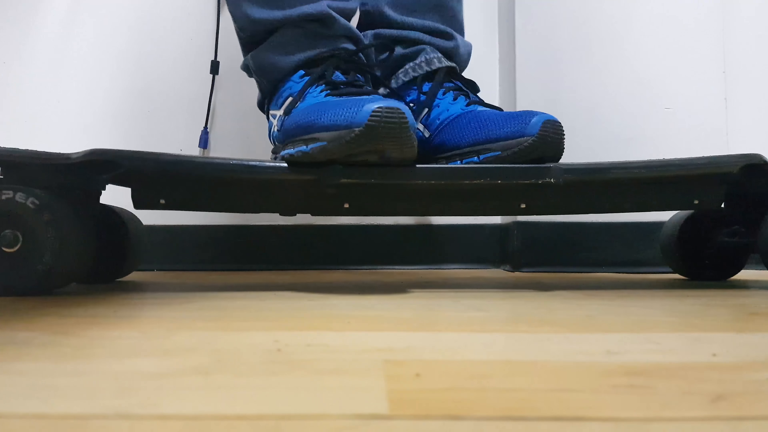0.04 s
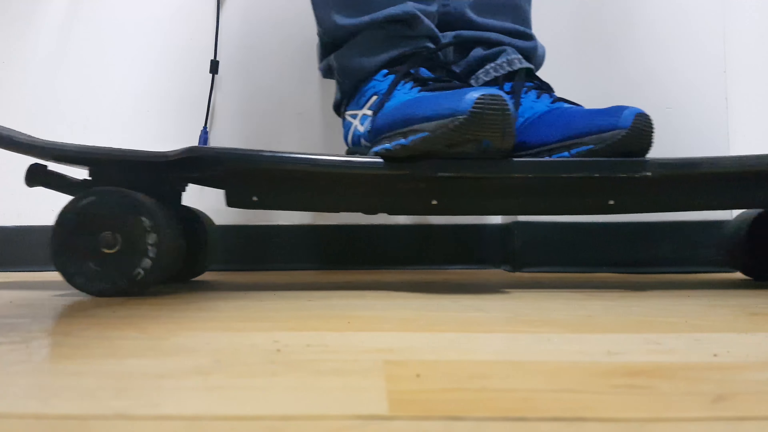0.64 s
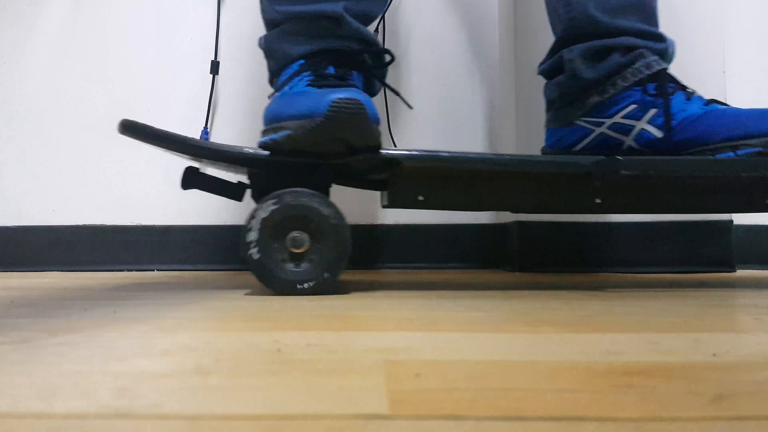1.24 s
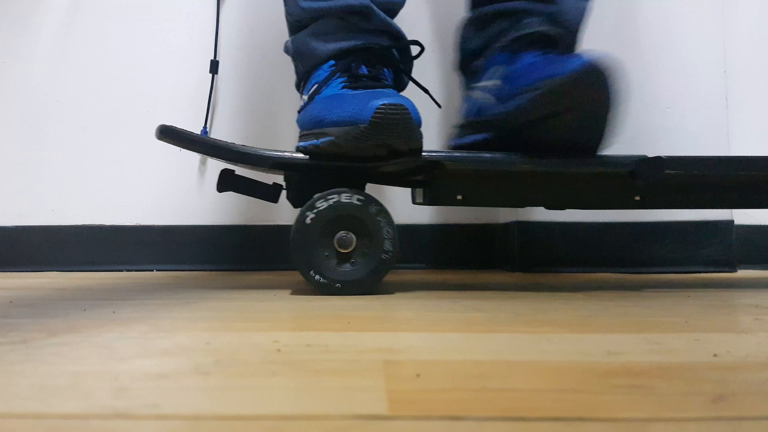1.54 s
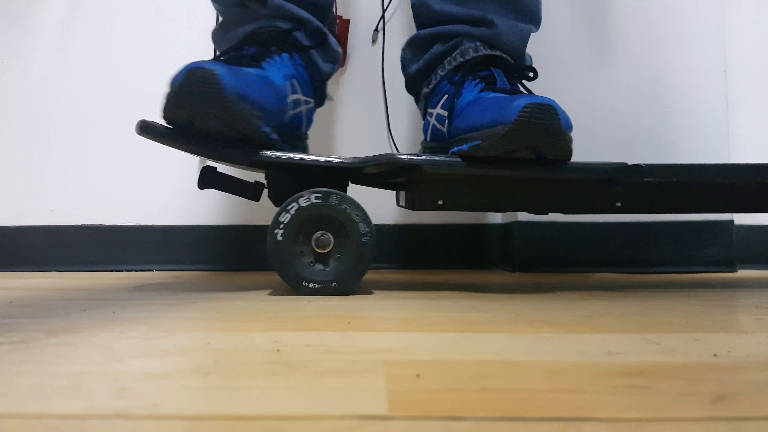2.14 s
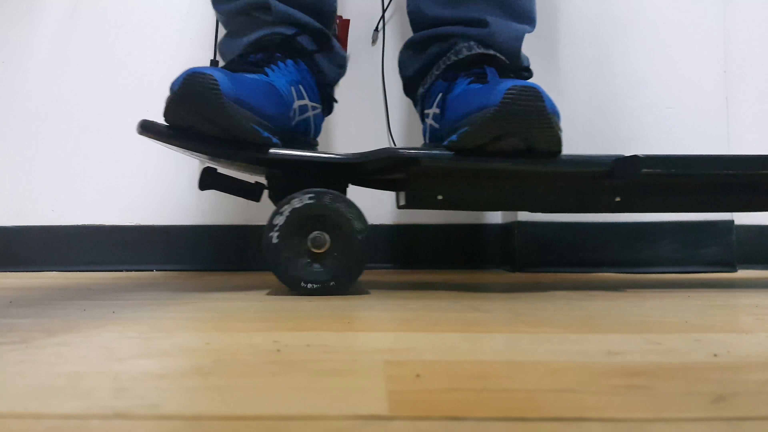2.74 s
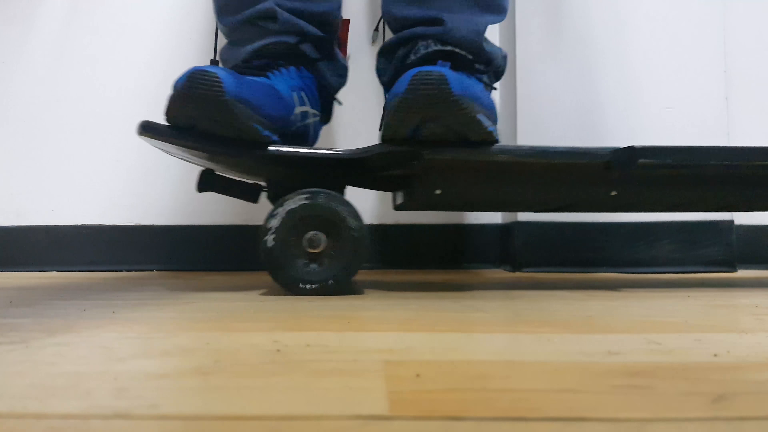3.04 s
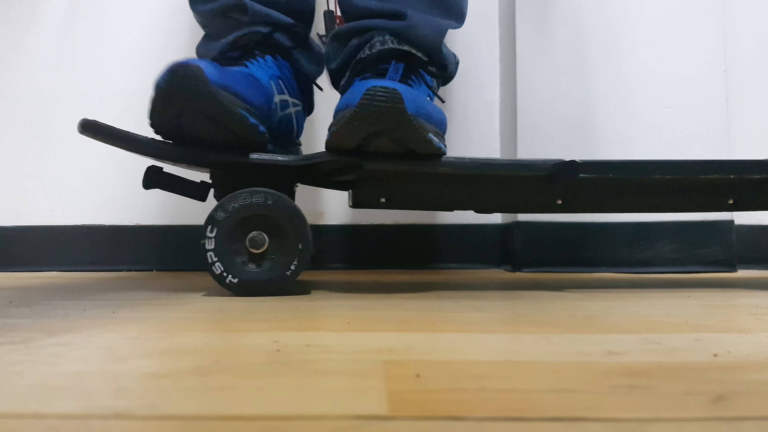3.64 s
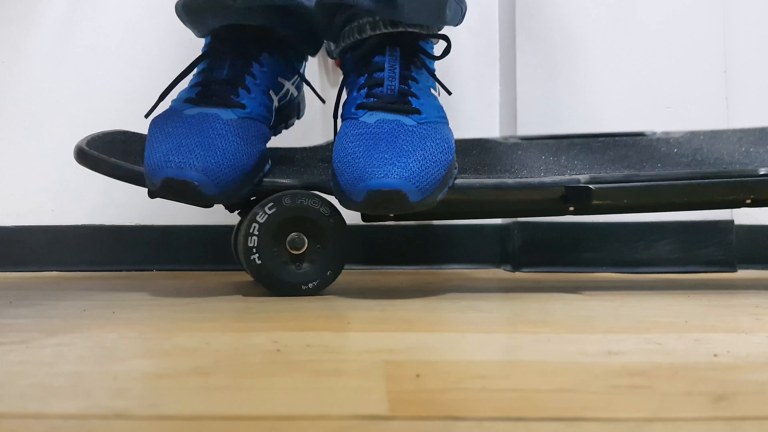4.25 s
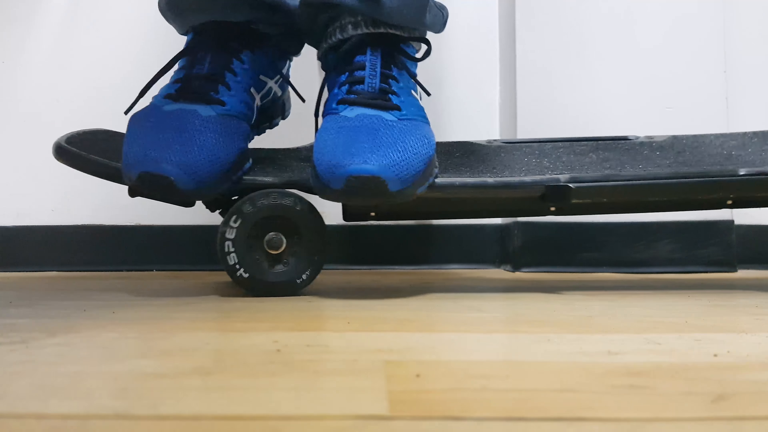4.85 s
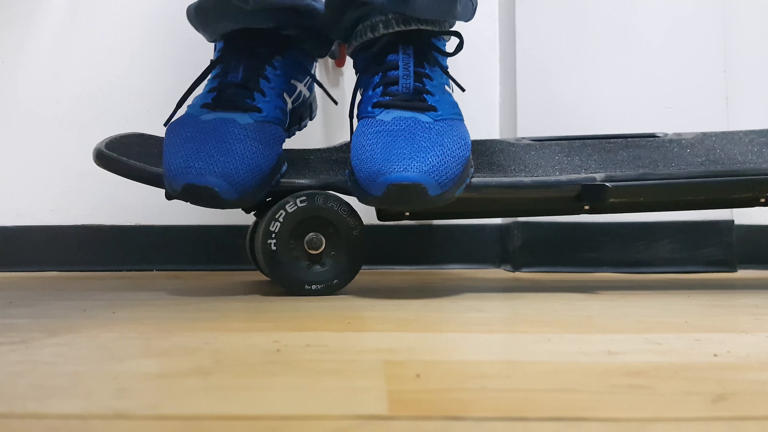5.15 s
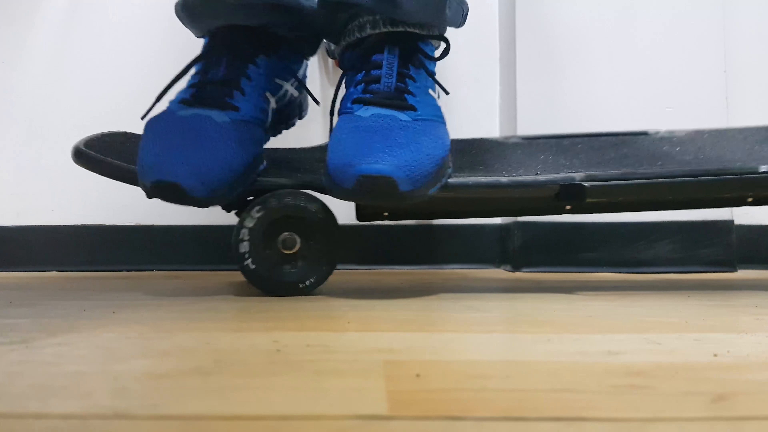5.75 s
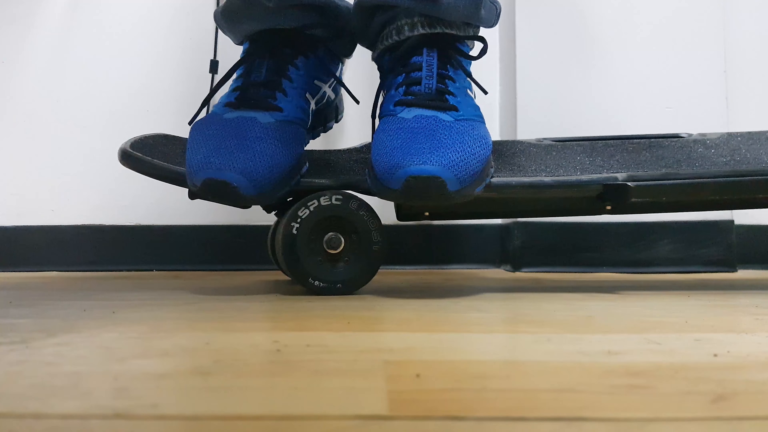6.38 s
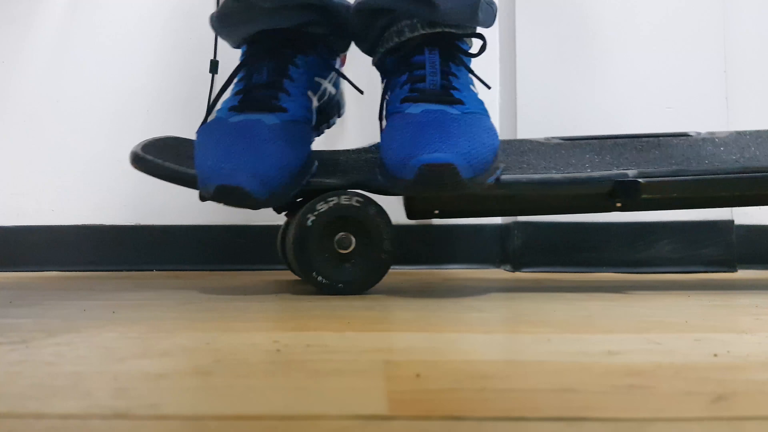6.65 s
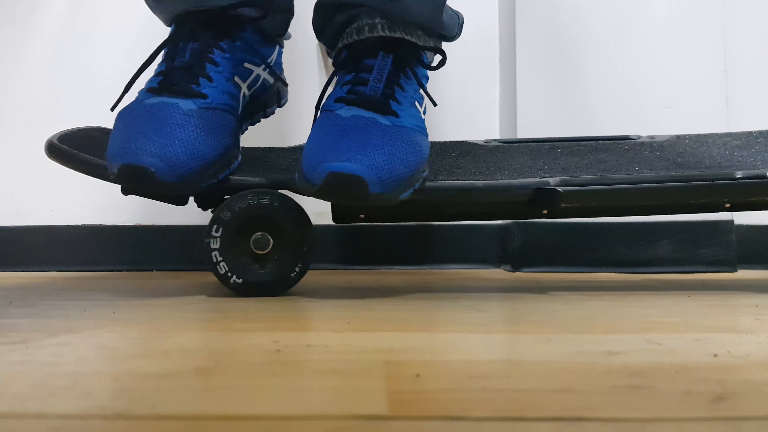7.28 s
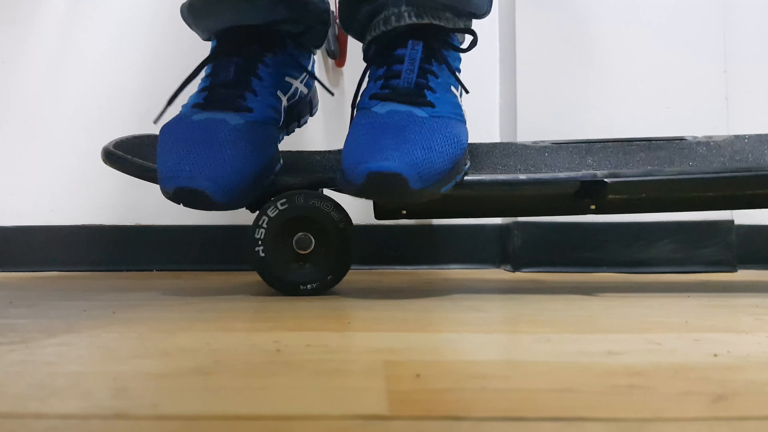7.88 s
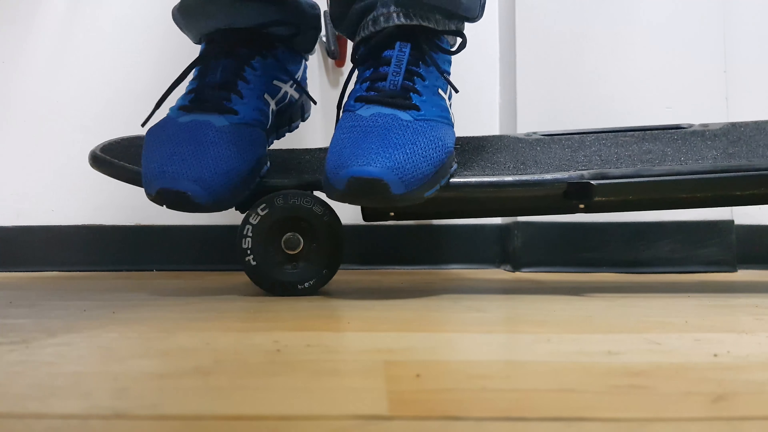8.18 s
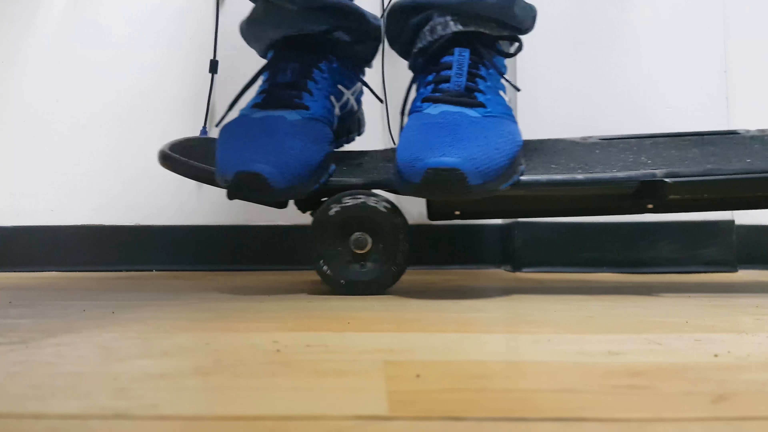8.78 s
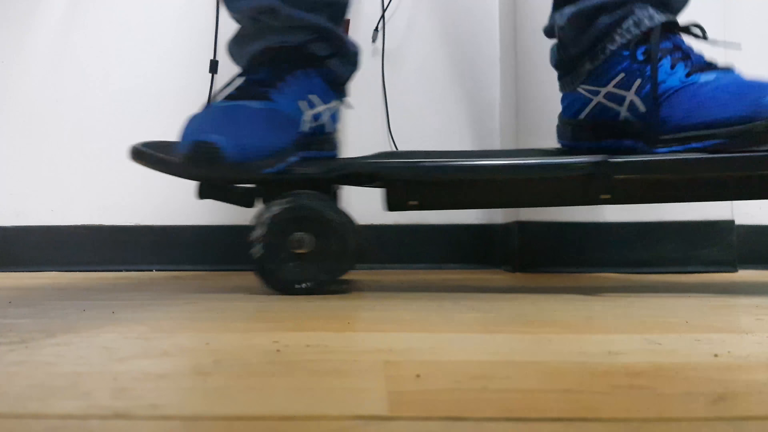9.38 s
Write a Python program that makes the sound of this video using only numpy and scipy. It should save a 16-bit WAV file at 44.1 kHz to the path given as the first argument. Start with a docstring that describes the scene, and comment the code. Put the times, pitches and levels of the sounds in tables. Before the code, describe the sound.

A rider shifts weight on a heavy skateboard on a wooden floor, close to a stereo microphone pair in a small room. First the wheels bump and the trucks clack, then shoes thud irregularly on the deck, with small clicks, grip tape scuffs and rubbing trousers. After a quieter stretch comes the heaviest wheel landing, then one more thud and a few clicks. Ventilation rushes steadily underneath with a faint, wavering low hum.

```python
"""A steady rush of ventilation fills a small room, with a faint low hum wavering under it.
Close to a pair of microphones, a rider shifts his weight on a heavy skateboard on a wooden floor.
Soles and trousers rub, small slips click in the deck, and shoes rasp and scuff on the grip tape.
Wheels land and chatter, the trucks knock in their play, and shoes thud on the deck, ringing the
floorboards. The near walls give the board's sounds a short tail."""
import sys
import numpy as np
from scipy import signal
from scipy.fft import rfft, irfft, next_fast_len
from scipy.io import wavfile

SR = 44100
rng = np.random.default_rng(int(sys.argv[2]) if len(sys.argv) > 2 else 0)


def int16_out(signal):
    """Quantize to a 16-bit WAV file."""
    q = np.round(np.clip(np.atleast_2d(signal).T, -1, 1) * 32767)
    wavfile.write(sys.argv[1], SR, q.astype(np.int16))


N = 415422
TIME = np.arange(N) / SR
BLOW_TIME = TIME[:SR // 3]   # time within one blow

# Levels in the tables are relative: each source adds its own gain.
# room tone, dipping near the start and the end: t/s, level/dB
ROOM_TONE = [(0, -42.5), (.13, -56), (.35, -52), (1.0, -46), (3.9, -47.5), (5.5, -46.5), (7.75, -47),
             (8.25, -52), (9.05, -52.5), (9.42, -49)]
# spectra of the ventilation's rumble and rush, and of the microphones' hiss: f/Hz, level/dB
VENT_RUMBLE = [(22, -15), (40, -11.5), (65, -2.5), (100, 1), (150, -5.5), (200, -8.5), (300, -21)]
VENT_RUSH = [(88, -36), (150, -7.5), (200, 0), (274, -5), (318, -9.5), (389, -6), (414, -7), (493, -5),
             (611, -16), (867, -16), (1030, -24.5), (2140, -36), (3000, -74), (3900, -85), (6600, -120)]
MIC_SPECTRUM = [(3000, 1.5), (6500, -2.5), (9000, -1), (13000, -1), (16000, -6.5)]
# low hum, perhaps a distant engine slowly gaining speed: t/s, f/Hz, level/dB
HUM_CURVE = [(0, 56, -56), (1.1, 56, -40), (2.3, 57.4, -44.5), (3.0, 59.6, -36.5), (3.85, 64.4, -37),
             (4.05, 64.5, -53), (4.72, 66.7, -29.5), (4.97, 68.5, -44), (5.24, 67.8, -35),
             (5.48, 67.7, -54), (6.2, 68.6, -41), (7.4, 69.5, -50), (9.42, 73.1, -51.5)]
# a foot shifts, and sole and trouser cloth rub: t/s, length/s, rubbing/dB, gritty hiss/dB
FOOT_SHIFTS = [(-.03, 0.017, -60, -71), (0.4, 0.049, -58.5, -70), (0.702, 0.19, -52.5, -58),
               (1.017, 0.3, -63.5, -70), (1.342, 0.24, -60.5, -71), (1.575, 0.16, -56, -62.5),
               (1.848, 0.84, -65, -74), (2.379, 0.11, -56, -65.5), (2.815, .24, -58.5, -65.5),
               (2.97, .05, -58.5, -66), (3.142, 0.44, -61.5, -67.5), (3.614, 0.75, -62.5, -67),
               (4.067, 0.17, -59, -64.5), (4.576, .63, -68.5, -72), (5.542, 0.26, -62.5, -69.5),
               (6.56, 0.41, -63.5, -70.5), (6.715, 0.23, -63, -62.5), (7.549, .17, -59, -71),
               (7.735, 0.052, -49.5, -64), (8.329, .17, -68.5, -75), (9.146, 0.041, -59.5, -62.5),
               (9.341, 0.075, -64.5, -69)]
# spectra of rubbing cloth and of the gritty hiss: f/Hz, level/dB
CLOTH_SPECTRUM = [(700, -4), (1400, 2.5), (2300, 0.5), (3700, -1), (5200, -6), (7000, -13.5),
                  (12000, -25.5)]
GRIT_SPECTRUM = [(2000, -19.5), (4500, -7), (6500, -14), (8500, 1), (9800, -4), (11200, -2), (13000, -6.5),
                 (16000, -17.5)]
# clicks of deck, bushings and soles: t/s, level/dB, centre f/Hz, bright edge/dB, left over right/dB
SLIPS = [(.046, -42.5, 647, -76, -2.5), (.4404, -39, 1560, -48, 2), (.6893, -43, 3800, -51, -3),
         (.7604, -28, 1100, -36, 0), (.8041, -24.5, 1250, -41, 1), (.8145, -22.5, 1820, -52, -1),
         (.902, -33, 1500, -61, 2), (.9532, -28.5, 1350, -55, 7.5), (1.4296, -30, 1550, -42, -3),
         (1.5945, -28, 1280, -36.5, 5.5), (1.6841, -36.5, 1210, -40.5, 2), (1.7499, -40, 1450, -68, -1),
         (2.2483, -33.5, 1580, -65, 9.5), (2.4035, -39, 1150, -64, 1.5), (2.4433, -28.5, 2750, -45, 0.5),
         (2.4838, -36, 1700, -67, 1.5), (2.9672, -26.5, 2720, -38, -3.5), (2.9916, -34, 1890, -63, -2.5),
         (3.075, -38, 1100, -42.5, -3.5), (3.2784, -39.5, 1100, -71, 3), (3.8384, -45, 1010, -49, 1),
         (3.8921, -40.5, 1230, -72, -3), (4.0073, -35, 1090, -49, 0.5), (4.1284, -38, 1070, -63, 1.5),
         (4.2128, -33.5, 1240, -58, 4.5), (4.2572, -44, 1970, -64, -6), (5.5543, -40, 1160, -51, 0),
         (5.7319, -35, 1370, -70, -2), (5.7708, -41.5, 3040, -60, -1.5), (6.5705, -47, 1108, -57, -2),
         (7.676, -38, 900, -48, 2.5), (7.7039, -36.5, 1070, -38, 1.5), (7.7598, -33.5, 1250, -61, 5),
         (7.7807, -39, 1100, -41, 2), (7.8221, -26.5, 930, -51, -3), (7.865, -29, 1250, -57, 1.5),
         (8.4906, -61, 2420, -57.5, -11.5), (8.6048, -36, 1005, -65, 2), (9.0977, -45, 903, -62, -7.5),
         (9.1715, -24, 1500, -41, 0), (9.2294, -32.5, 1000, -66, -.5), (9.402, -48, 1700, -62, 1)]
# ring of the deck under a click: f/Hz, level/dB, t60/s
DECK_MODES = [(678, 2.5, 0.038), (840, 1, 0.047), (1018, 0.5, 0.031), (1355, -4.5, 0.032),
              (1685, -1, 0.015), (1906, -6, 0.04), (2403, 2.5, 0.01), (2995, -1.5, 0.02), (3945, 0, 0.016)]
# soles twisting, and soles sliding, on the grip tape: t/s, length/s, level/dB
SOLE_TWISTS = [(.08, 0.11, -68), (.49, .09, -72), (.70, 0.3, -58), (1.06, 0.1, -56.5), (1.17, 0.15, -62),
               (2.83, .1, -69), (3.14, 0.28, -65), (3.41, 0.098, -60), (3.6, 0.18, -74), (5.15, 0.2, -69),
               (6.7, .1, -63), (7.62, .1, -60)]
SOLE_SLIDES = [(.745, 0.049, -45.5), (.80, 0.026, -39), (.83, 0.088, -56), (1.312, 0.065, -48.5),
               (5.11, .21, -64.5), (5.734, 0.018, -53.5), (7.36, 0.11, -57), (7.824, 0.0083, -44),
               (8.078, 0.077, -49.5)]
# spectra of a twist's thin rasp and of a slide's hiss: f/Hz, level/dB
TWIST_SPECTRUM = [(8000, -16.5), (9800, -9.5), (10700, -3.5), (11400, -3), (12200, -18.5), (14000, -11.5),
                  (15500, -23)]
SLIDE_SPECTRUM = [(900, -26), (2000, 4), (4000, 1.5), (5100, 0.5), (5550, 2), (6100, -6), (7000, -3),
                  (8500, 0.5), (11500, -6.5), (16000, -16)]
# hard wheel landings, and soft blows of the rider's weight: t/s, level/dB, thump f/Hz, boards' ring/dB
WHEEL_LANDINGS = [(.355, -21, 140, -35), (0.741, -16.5, 138, -25.5), (7.865, -2.5, 144, -19.5)]
SHOE_THUDS = [(.448, -30, 78, -42), (.487, -27.5, 79, -60), (0.864, -14, 89, -27), (0.903, -11.5, 106, -24),
              (.951, -18, 123, -38), (1.276, -13, 145, -31.5), (1.622, -15, 110, -30),
              (2.204, -28, 68.5, -47), (2.403, -7.5, 131.5, -29), (2.771, -31.5, 68, -53),
              (3.011, -25.5, 81, -47), (3.075, -5, 128, -27.5), (3.279, -23, 82, -37.5),
              (3.478, -25.5, 105, -65), (4.332, -25, 83, -54), (5.732, -16.5, 91, -25.5),
              (5.791, -12.5, 107.2, -41), (6.78, -24.5, 88.4, -33.5), (6.883, -29.5, 126, -43),
              (7.541, -31, 71.6, -47), (7.673, -15, 101.7, -29), (7.821, -6, 91.6, -18.5),
              (8.606, -8.5, 130, -25), (8.632, -15.5, 79.4, -34.5)]
# ring of floorboards and deck under a blow: f/Hz, level/dB, t60/s
BOARD_MODES = [(207.3, -2, 0.22), (274.4, -1.5, 0.05), (340, 2, 0.049), (367.8, -0.5, 0.12),
               (443, -2, 0.089), (517, -4.5, 0.04), (744, -8.5, 0.11)]
# the trucks slam to the end of their play: t/s, hollow body/dB, metallic clack/dB
TRUCK_KNOCKS = [(.355, -19, -24), (.7395, -14, -18.5), (.9245, -24.5, -30.5), (1.2764, -22, -30),
                (1.594, -29, -34), (7.825, -46.5, -28), (9.172, -49, -29)]
# ring of a truck's hollow body and of its metal parts: f/Hz, level/dB, t60/s
BODY_MODES = [(540, -5, 0.032), (612, -0.5, 0.033), (727, -6.5, 0.025), (1004, -8.5, 0.025)]
METAL_MODES = [(1570, 0.5, 0.013), (2060, -6.5, 0.022), (2425, -12.5, 0.036), (2925, -1.5, 0.012)]
# likeness of diffuse sound at the two microphones: f/Hz, correlation
MIC_CORRELATION = [(60, 0.95), (150, 0.95), (300, 0.94), (600, 0.39), (1200, 0), (12000, 0.11)]
# decay of the small room: f/Hz, t60/s
REVERB_T60 = [(70, 0.34), (200, 0.5), (600, 0.29), (2500, 0.19), (6000, 0.35), (14000, 0.7)]
# strength of its reverberation at the microphones: f/Hz, level/dB
REVERB_LEVEL = [(60, -12), (130, -13.5), (300, -4), (700, -9.5), (2000, -6), (5000, -5), (14000, -4.5)]


def from_db(db):
    """Decibels to gain."""
    return 10 ** (np.asarray(db) / 20)


def rms_one(x):
    """Scale to unit rms."""
    return x / np.sqrt(np.mean(x ** 2) + 1e-20)


def peak_one(x):
    """Scale to unit peak."""
    return x / np.abs(x).max()


def in_time(rows):
    """Each column of a curve at every sample."""
    s, *columns = np.transpose(rows)
    return [np.interp(TIME, s, column) for column in columns]


def at_hz(points, hz):
    """Read a curve on a log-frequency axis."""
    known_hz, values = np.transpose(points)
    return np.interp(np.log(hz), np.log(known_hz), values)


def filtered(x, hz, kind, order=2):
    """Causal Butterworth filter."""
    return signal.sosfilt(signal.butter(order, hz, kind, fs=SR, output="sos"), x)


def drift(rate):
    """Random wander of unit rms, with `rate` new values a second."""
    knots = rng.standard_normal(int(N / SR * rate) + 2)
    return rms_one(np.interp(TIME * rate, np.arange(len(knots)), knots))


def add(out, s, sound):
    """Mix a sound in at s seconds."""
    start = max(0, int(s * SR))
    out[..., start:start + sound.shape[-1]] += sound[..., :N - start]


def pan(left_db):
    """Gains that raise the left microphone and lower the right by as much."""
    return from_db([[left_db], [-left_db]])


def mic_pair(x, lag_ms):
    """The left microphone hears the sound later than the right, or sooner if the lag is negative."""
    t = TIME[:len(x)]
    return np.array([np.interp(t - lag_ms / 1000, t, x, left=0), x])


def diffuse(size):
    """Frequencies and spectrum of white stereo noise, alike in the bass and unrelated in the treble."""
    hz = np.maximum(np.fft.rfftfreq(size, 1 / SR), 1)
    alike = at_hz(MIC_CORRELATION, hz)
    mid, side = rfft(rng.standard_normal((2, size)))
    return hz, np.sqrt(1 + alike) * mid + np.sqrt(1 - alike) * side * [[1], [-1]]


def noise(spectrum):
    """Diffuse noise of a given colour and unit rms, falling away beyond the spectrum's ends."""
    hz, white = diffuse(next_fast_len(N))
    low_cut = 1 / (1 + (spectrum[0][0] / hz / 2) ** 4)
    high_cut = 1 / (1 + (hz / spectrum[-1][0] / 2) ** 4)
    colour = low_cut * high_cut * from_db(at_hz(spectrum, hz))
    return rms_one(irfft(white * colour)[:, :N])


def decay(t60):
    """Envelope that falls 60 dB in t60 seconds."""
    return from_db(-60 * BLOW_TIME / t60)


def ring(modes, scatter_db, detune):
    """One damped sine per mode; strength and pitch vary at random, as with load and point of contact."""
    hz, db, t60 = np.transpose(modes)[:, :, None]
    strength, shift = rng.standard_normal((2, len(modes), 1))
    signs = (-1) ** np.arange(len(modes))[:, None]
    sines = np.sin(2 * np.pi * hz * (1 + detune * shift) * BLOW_TIME)
    return signs * from_db(db + scatter_db * strength) * sines * decay(t60)


def contact_burst(t60, rise_s):
    """The short burst of roughness as two surfaces meet and bed in."""
    return rng.standard_normal((2, len(BLOW_TIME))) * decay(t60) * (1 - np.exp(-BLOW_TIME / rise_s))


def room_tone(rumble_db=5.0, rush_db=3.5, hiss_db=-26.5):
    """Ventilation rumbles and rushes all round the microphones, which add their own smooth hiss."""
    level_db, = in_time(ROOM_TONE)
    ventilation = from_db(rumble_db) * noise(VENT_RUMBLE) + from_db(rush_db) * noise(VENT_RUSH)
    return from_db(level_db) * (ventilation + from_db(hiss_db) * noise(MIC_SPECTRUM))


def hum(gain_db=-1.0, waver=0.029):
    """One low, unsteady note that slowly climbs, the same at both microphones."""
    hz, db = in_time(HUM_CURVE)
    phase = 2 * np.pi * np.cumsum(hz * (1 + waver * drift(15))) / SR
    return np.sqrt(2) * from_db(db + gain_db) * np.sin(phase)


def friction(rise_s=0.032, fade_s=0.14, rest_rub_db=-27.5, rest_hiss_db=-38):
    """Strength of the rubbing and of its hiss: each shift of a foot rises, holds and fades."""
    tone_db, = in_time(ROOM_TONE)
    power = from_db([tone_db + rest_rub_db, tone_db + rest_hiss_db]) ** 2   # feet are never quite still
    for s, length, rub_db, hiss_db in FOOT_SHIFTS:
        rise = np.clip((TIME - s) / rise_s, 0, 1)
        fade = np.exp(-np.maximum(TIME - s - length, 0) / fade_s)
        power += (from_db([[rub_db], [hiss_db]]) * rise * fade) ** 2
    return np.sqrt(power)


def rubbing(rub, scrape, cloth_db=0.44, grit_db=-0.2):
    """Cloth and rubber stick and slip in tiny grains while the feet rock."""
    grains = from_db(2.0 * drift(500) + 0.9 * drift(35))
    cloth = rub * from_db(cloth_db) * noise(CLOTH_SPECTRUM) * pan(left_db=-1.5)
    hiss = scrape * from_db(grit_db) * noise(GRIT_SPECTRUM) * pan(left_db=2.0)
    return grains * (cloth + hiss)


def tiny_slips(rub, count=30, over_rub_db=10.5, spread_db=2.5, centre_hz=1700, edge_db=-21.5):
    """Faint ticks at random moments, as strong as the rubbing allows; rows like those of SLIPS."""
    s = rng.uniform(0, TIME[-1], count)
    softness, pitch, side = rng.standard_normal((count, 3)).T
    db = 20 * np.log10(np.interp(s, TIME, rub)) + over_rub_db - spread_db * softness
    return list(zip(s, db, centre_hz * 2 ** (pitch / 2), db + edge_db, 2 * side))


def clicks(slips, ring_db=-0.5, crack_db=9.0, edge_db=13.0, focus_db=4.5, band_ratio=1.43):
    """Each small slip rings the deck modes near its own pitch, with a gritty crack."""
    out = np.zeros((2, N))
    mode_hz = np.array(DECK_MODES)[:, 0]
    for s, db, hz, bright_db, pan_db in slips:
        octaves_away = np.log2(mode_hz / hz)
        loss_db = 3.5 * np.log2(hz / mode_hz[2])   # a small, high slip moves the deck less
        mode_gains = from_db(db + ring_db - loss_db - focus_db * octaves_away ** 2)
        deck = mode_gains @ ring(DECK_MODES, scatter_db=3.5, detune=0.041)
        burst = contact_burst(t60=0.024, rise_s=0.003)
        crack = from_db(db + crack_db) * filtered(burst, [hz / band_ratio, hz * band_ratio], "band")
        treble = filtered(burst, 2600, "high")
        edge = from_db(bright_db + edge_db) * filtered(treble, 5000, "low", order=1)
        # the nearer microphone hears the deck sooner and the whole click louder
        click = mic_pair(deck, lag_ms=-0.95 * pan_db) + crack + edge
        add(out, s, click * pan(left_db=pan_db / 2))
    return out


def strokes(table):
    """Rubbing force that swells and fades once in each stroke."""
    force = np.zeros(N)
    for s, length, db in table:
        add(force, s, from_db(db) * np.sqrt(np.hanning(int(length * SR))))
    return force


def scuffs(slide_catch_db=3.5, twist_catch_db=1.5):
    """A sliding sole hisses and catches on the grip tape; a twisting one rasps thinly."""
    hiss = strokes(SOLE_SLIDES) * from_db(slide_catch_db * drift(430)) * noise(SLIDE_SPECTRUM)
    rasp = strokes(SOLE_TWISTS) * from_db(twist_catch_db * drift(90)) * noise(TWIST_SPECTRUM)
    return hiss + rasp


def wheel_blows(gap_s=0.016, loss_db=2.5):
    """Landing wheels chatter: they touch the floor three times, each time weaker."""
    return [(s + bounce * gap_s, db - bounce * loss_db, hz, ring_db - bounce * loss_db)
            for s, db, hz, ring_db in WHEEL_LANDINGS for bounce in range(3)]


def thumps(blows, thump_db=3.5, boards_db=6.5, half_band=0.37, sway_hz=74, sway_db=-19.0):
    """The loaded deck gives a few heavily damped swings; the boards ring and the floor sways on."""
    out = np.zeros(N)
    impulse = signal.unit_impulse(len(BLOW_TIME))
    sway = from_db(sway_db) * np.sin(2 * np.pi * sway_hz * BLOW_TIME) * decay(t60=0.3)
    for s, db, hz, ring_db in blows:
        force = from_db(db + thump_db)
        band_hz = [hz * (1 - half_band), hz * (1 + half_band)]
        swing = -peak_one(filtered(impulse, band_hz, "band", order=3))
        boards = ring(BOARD_MODES, scatter_db=3.0, detune=0.04).sum(0)
        boards = peak_one(filtered(boards, 600, "low", order=3))   # rubber is too soft to pass treble
        after_ring = filtered(from_db(ring_db + boards_db) * boards - force * sway, 24, "high")
        add(out, s, force * swing + after_ring)
    return mic_pair(out, lag_ms=0.29)


def truck_knocks(body_db=3.5, metal_db=-1.5, crack_db=10.5, edge_db=-9.0):
    """Right of centre, metal meets metal with a crack, and the heavy truck gives a hollow note."""
    out = np.zeros((2, N))
    for s, hollow_db, clack_db in TRUCK_KNOCKS:
        hollow_note = peak_one(ring(BODY_MODES, scatter_db=1.0, detune=0.0035).sum(0))
        body = from_db(hollow_db + body_db) * hollow_note
        metal = from_db(clack_db + metal_db) * ring(METAL_MODES, scatter_db=5.5, detune=0.055).sum(0)
        burst = contact_burst(t60=0.021, rise_s=0.00055)
        crack = from_db(crack_db) * filtered(burst, [1700, 4000], "band", order=3)
        edge = from_db(edge_db) * filtered(burst, [4200, 9500], "band")
        add(out, s, mic_pair(body + metal, lag_ms=0.4) + from_db(clack_db) * (crack + edge))
    return out * pan(left_db=-2.0)


def shoe_blows(settle_s=0.027, settle_hz=77.6, loss_db=17):
    """The rider's weight comes down on the deck, which then settles with a weaker low thump."""
    settling = [(s + settle_s, db - loss_db, settle_hz, ring_db - loss_db)
                for s, db, _, ring_db in SHOE_THUDS]
    return list(SHOE_THUDS) + settling


def room_reflections(x, first_echo_s=0.006):
    """Dense reflections that set in after the nearest wall and die band by band."""
    t = TIME[:SR]
    hz, white = diffuse(SR)
    onset = np.clip(t / first_echo_s - 0.5, 0, 1)
    edges_hz = np.geomspace(20, 17000, 25)
    response = 0
    for low, high in zip(edges_hz, edges_hz[1:]):
        centre = np.sqrt(low * high)
        band = irfft(white * ((hz >= low) & (hz < high)))
        tail = band * onset * from_db(-60 * t / at_hz(REVERB_T60, centre))
        gain = np.sqrt(2 * (high - low)) / SR * from_db(at_hz(REVERB_LEVEL, centre))
        response = response + gain * rms_one(tail)
    return signal.fftconvolve(x, response, axes=1)[:, :N]


def scene():
    """The skateboard close by with its reflections, over rubbing, hum and room tone."""
    rub, scrape = friction()
    board = thumps(wheel_blows() + shoe_blows()) + truck_knocks()
    board += clicks(list(SLIPS) + tiny_slips(rub)) + scuffs()
    return board + room_reflections(board) + rubbing(rub, scrape) + hum() + room_tone()


def record(dry, cutoff_hz=15900):
    """The highest peaks are rounded off and the top of the treble is cut."""
    rounded = dry / (1 + dry ** 6) ** (1 / 6)
    return signal.sosfilt(signal.ellip(10, 0.1, 70, cutoff_hz, fs=SR, output="sos"), rounded)


dry = scene()
out = record(dry)
int16_out(out)
```